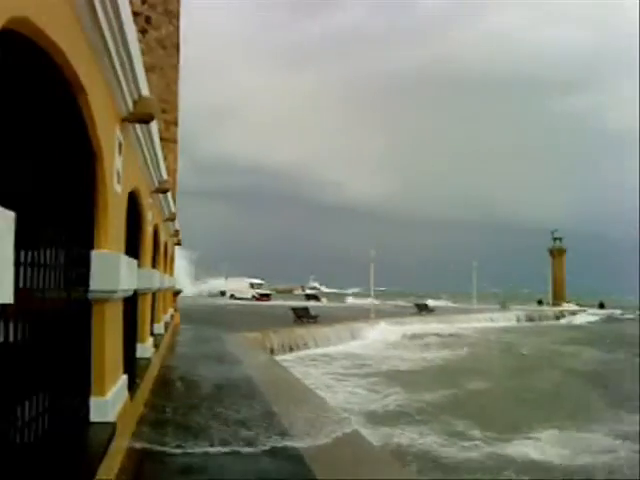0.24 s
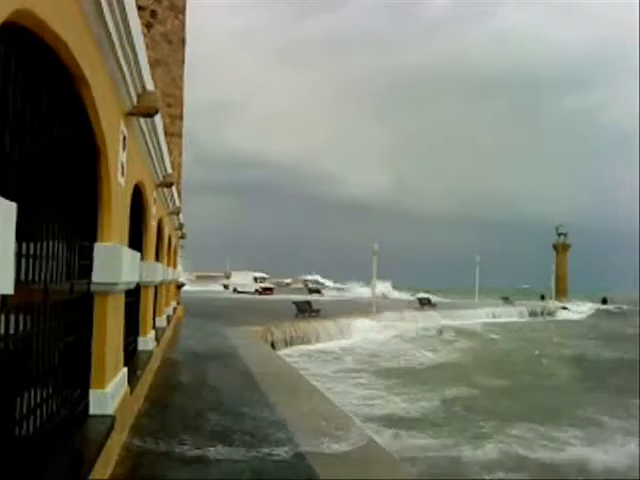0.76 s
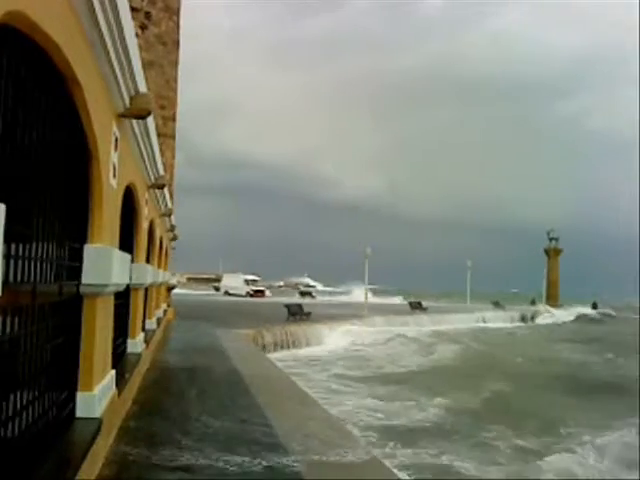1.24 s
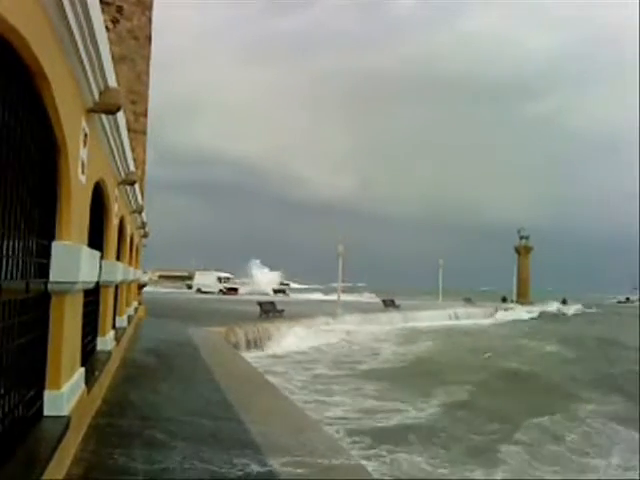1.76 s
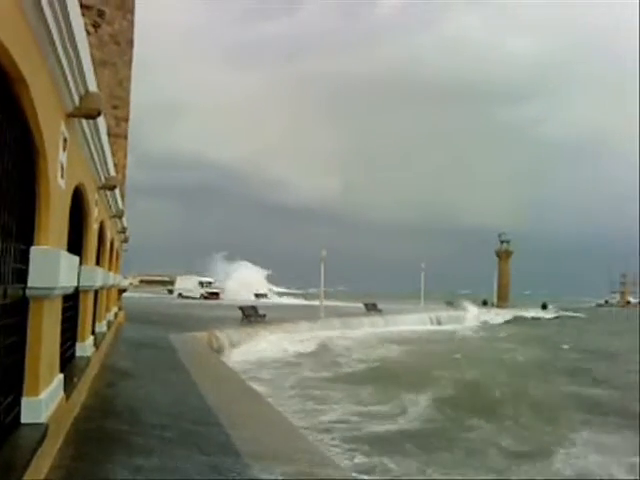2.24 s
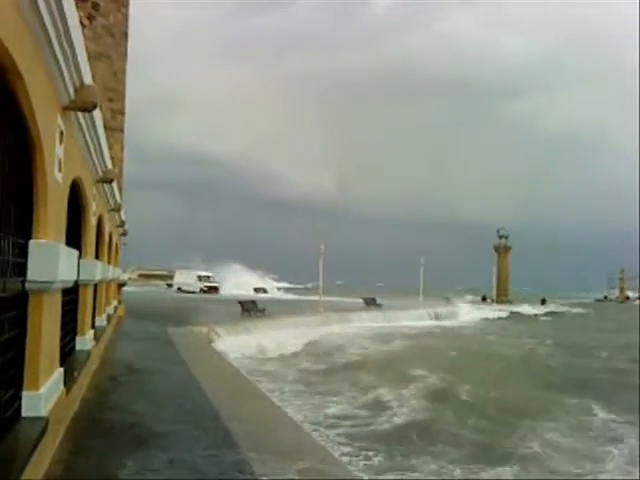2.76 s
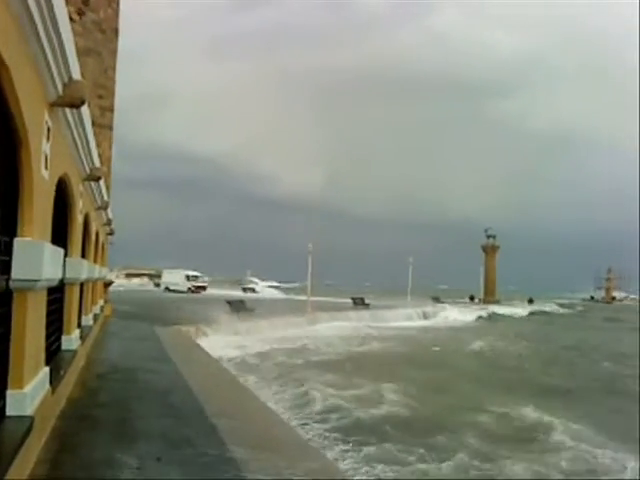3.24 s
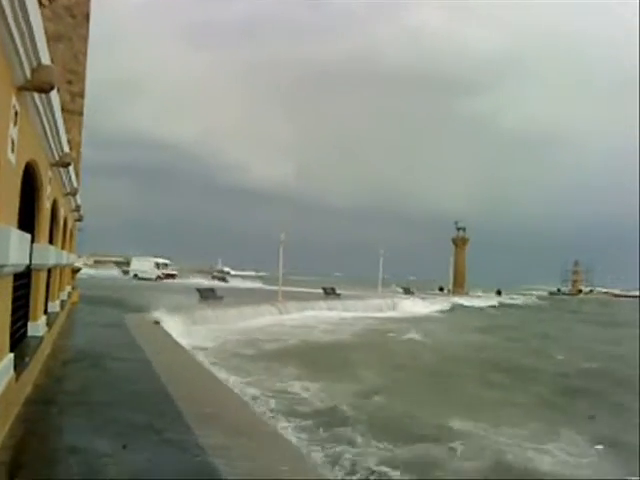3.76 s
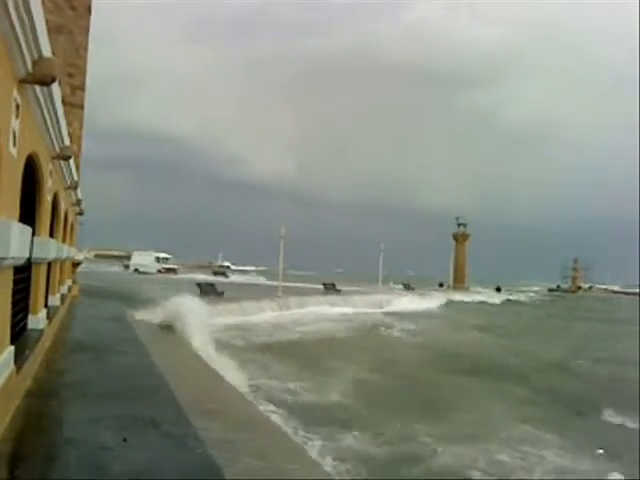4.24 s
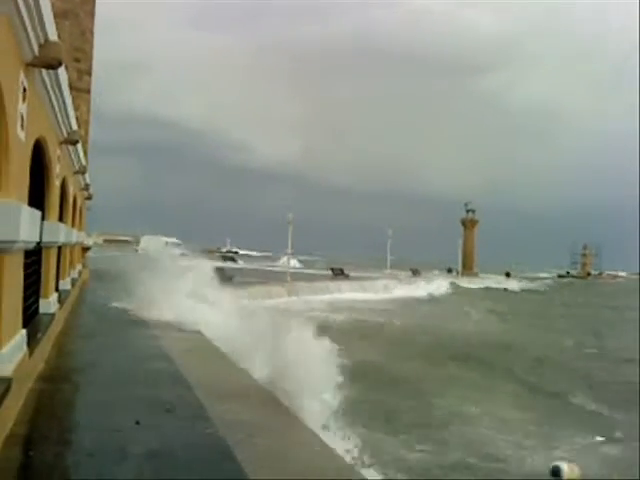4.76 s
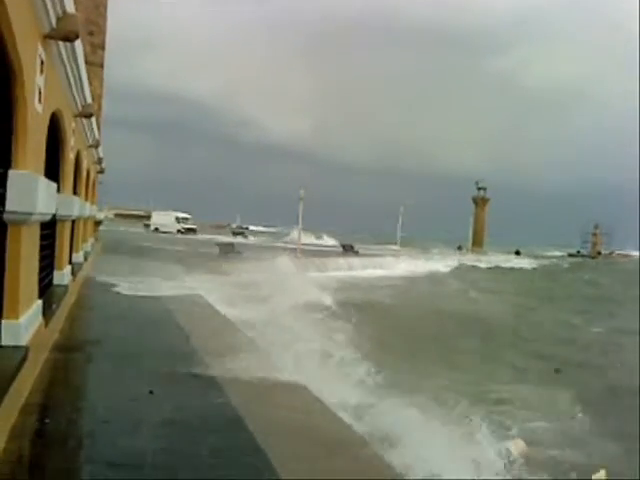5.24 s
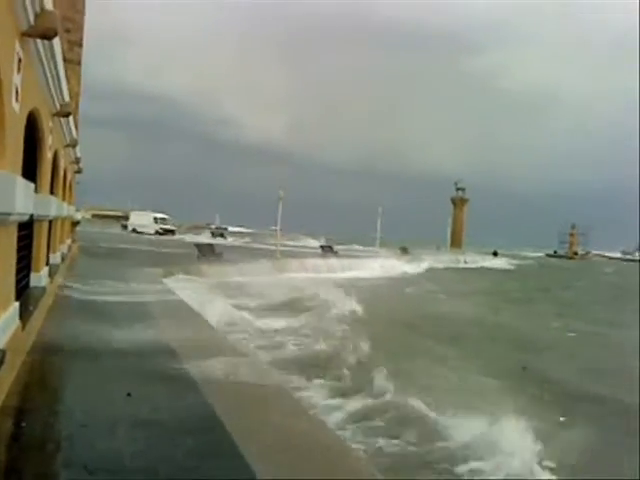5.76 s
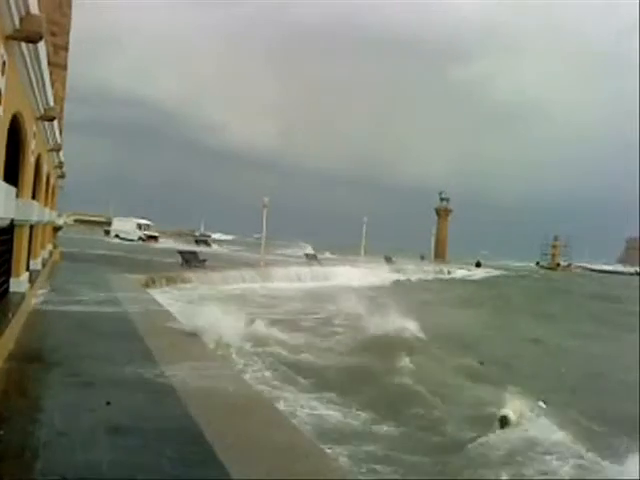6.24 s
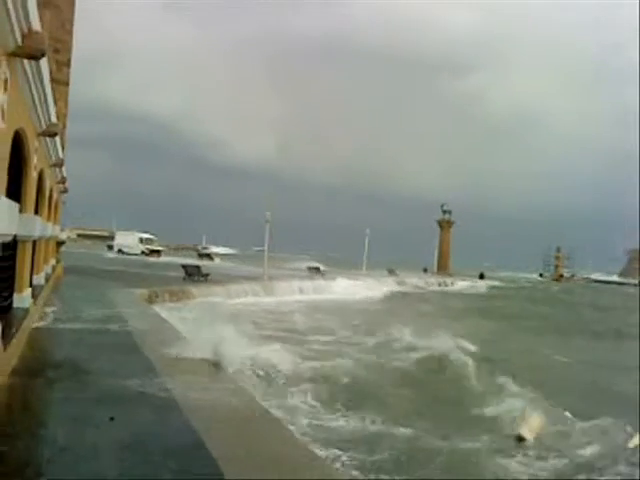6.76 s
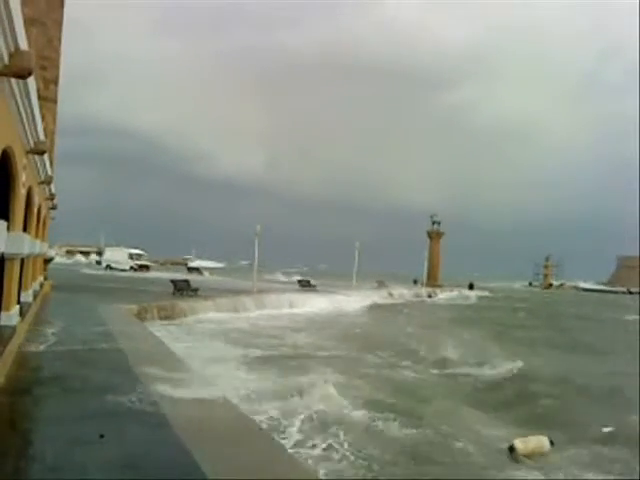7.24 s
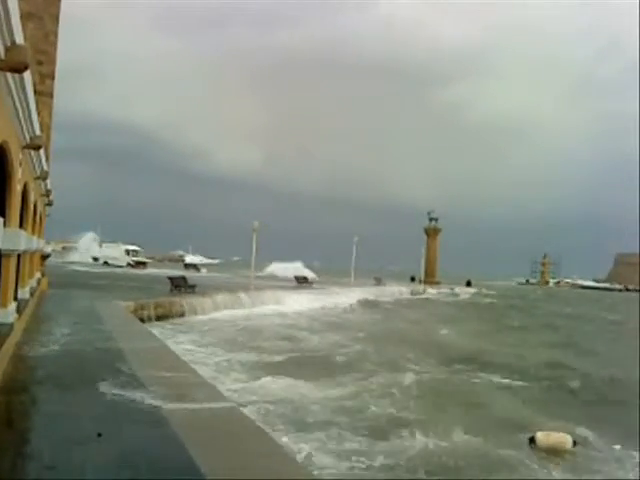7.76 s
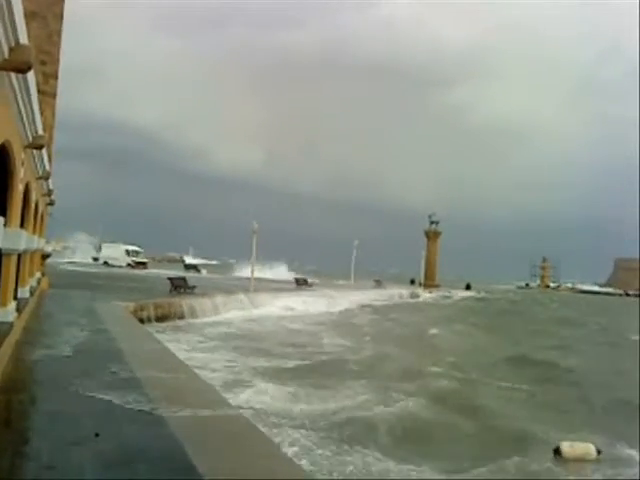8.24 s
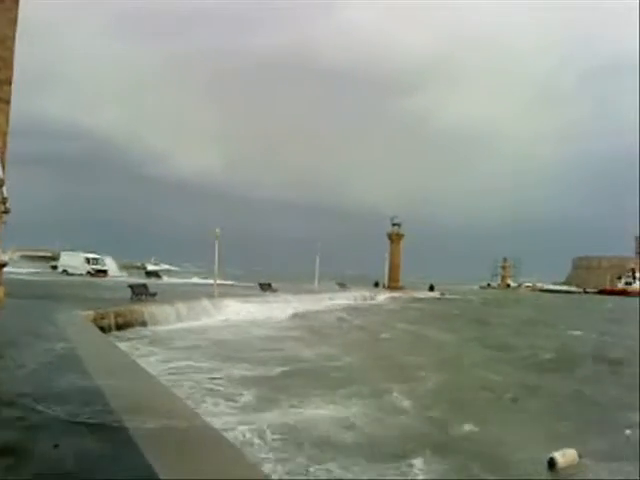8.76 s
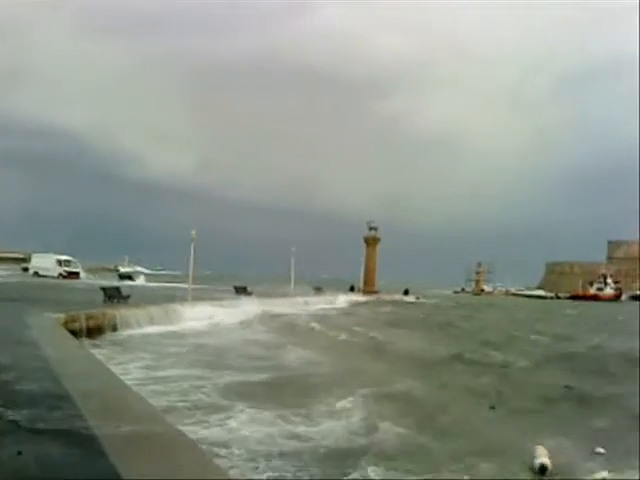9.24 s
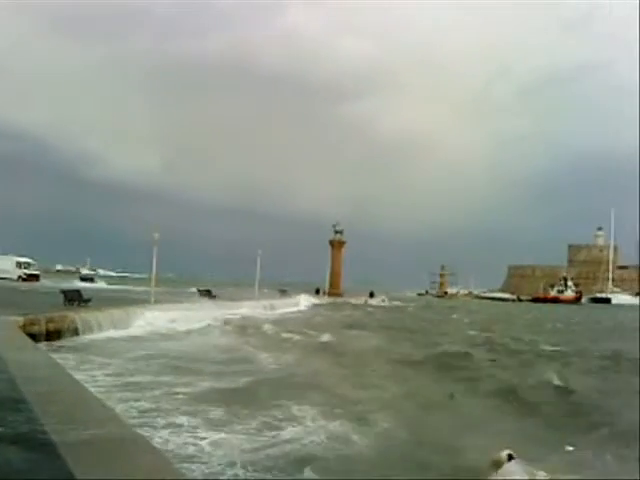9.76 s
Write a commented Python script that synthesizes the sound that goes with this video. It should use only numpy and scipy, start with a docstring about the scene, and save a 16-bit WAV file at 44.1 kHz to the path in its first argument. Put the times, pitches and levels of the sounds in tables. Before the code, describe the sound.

Hard wind gusts dominate, buffeting a small bare microphone with deep rumble, thumps, rasps and crackle. Behind them a rough sea roars and hisses along an open stone quay, rising gradually and dipping quickly. Near the middle a wave swells, bursts on the wall and falls back as splashing water, followed by a weaker surge. Gusts then keep striking, easing towards the end.

```python
"""Wind gusts buffet a small microphone on a stormy harbour quay and tear at its port; single eddies
thump, rasp and slap: coloured noise under gust envelopes, plus short bell-shaped noise bursts.
Behind them the levels of the sea's roar and the spray's hiss rise and dip together: noise churning by octaves.
Waves burst on the quay wall and rain back down: noise and random impacts under surge envelopes."""
import sys
import numpy as np
from scipy import signal
from scipy.fft import rfft, irfft
from scipy.io import wavfile
from scipy.ndimage import uniform_filter1d

SR = 44100
rng = np.random.default_rng(int(sys.argv[2]) if len(sys.argv) > 2 else 0)


def put_to_file(sound):
    """Save the sound as 16-bit audio at rate SR, in the file named by the first command-line argument."""
    columns = np.atleast_2d(sound).T  # one column per channel
    safe = np.clip(columns, -1, 1)
    whole_steps = np.round(safe * 32767)
    wavfile.write(sys.argv[1], SR, whole_steps.astype(np.int16))


N = 441000
T = np.arange(N) / SR


def undb(db):
    """Decibels to gain."""
    return 10 ** (np.asarray(db) / 20)


def unit(x):
    """Scale to rms 1."""
    return x / np.sqrt(np.mean(x ** 2))


def noise():
    """White noise."""
    return rng.standard_normal(N)


def colour(x, points):
    """Weight the spectrum of x by (hz, db) points joined on a log-frequency axis; rms 1."""
    hz, db = np.transpose(points)
    f_hz = np.maximum(np.arange(N // 2 + 1) * SR / N, 1)
    gain = undb(np.interp(np.log(f_hz), np.log(hz), db))
    return unit(irfft(rfft(x) * gain, N))


def walk(rate_hz):
    """Smooth random signal that changes about rate_hz times a second; rms 1."""
    width = max(int(SR / rate_hz), 2)
    return unit(uniform_filter1d(uniform_filter1d(noise(), width), width))


def even(x, span_s):
    """Hold the level of x steady over spans longer than span_s, keeping its quick flutter."""
    width = int(span_s * SR)
    power = uniform_filter1d(uniform_filter1d(x ** 2, width), width)
    return x / np.sqrt(power + 1e-9)


def drops(rate_hz, spread_db):
    """Random impacts of either sign, mostly small and a few large; rms 1."""
    hit = rng.random(N) < rate_hz / SR
    size = undb(spread_db * np.minimum(rng.exponential(size=N), 5))
    return unit(hit * size * np.sign(noise()))


def churn(x, depth_db, rate_hz):
    """Let each octave of x wax and wane by itself, as patches of foam come and go; rms 1."""
    f_hz = np.arange(N // 2 + 1) * SR / N
    octave = np.log2(np.clip(f_hz, 125, 8000) / 125)
    spectrum = rfft(x)
    total = np.zeros(N)
    for k in range(7):
        band = irfft(spectrum * np.maximum(1 - abs(octave - k), 0), N)  # bands overlap as triangles
        total += band * undb(depth_db * walk(rate_hz))
    return unit(total)


def envelope(start_s, hold_s, rise_s, fall_s):
    """Grow exponentially to 1 at start_s, hold, then die away; rise and fall are time constants."""
    before = (start_s - T) / rise_s
    after = (T - start_s - hold_s) / fall_s
    return np.exp(-np.maximum(np.maximum(before, after), 0))


def together(steady_db, events):
    """Gain of a steady level plus (db, envelope) events, whose powers add."""
    power = undb(steady_db) ** 2 + sum((undb(db) * shape) ** 2 for db, shape in events)
    return np.sqrt(power)


def sea_levels():
    """Gains of roar and spray: heard level rises, mostly gradual, and dips, mostly quick, shared by both."""
    # rises in the heard level of the sea: peak_s, hold_s, rise_s, fall_s, roar_db, spray_db
    level_rows = [(0.046, 0.18, 0.1, 0.11, -29, -58), (1.804, 0.42, 0.65, 0.034, -23.5, -32),
                  (2.69, 0.12, 0.45, 0.52, -27, -37), (4.05, 0.64, 0.31, 0.068, -29, -38.5),
                  (5.678, 0.75, 0.61, 0.073, -24.5, -33), (7.6, 0.078, 0.31, 0.23, -28, -37),
                  (7.997, 0.11, 0.17, 0.07, -27.5, -39.5), (9.643, 0.46, 0.26, 0.1, -26, -35)]
    base_roar_db, base_spray_db = -34.5, -44.5
    shapes = [envelope(s, hold, rise, fall) for s, hold, rise, fall, _, _ in level_rows]
    *_, roar_db, spray_db = np.transpose(level_rows)
    roar_gain = together(base_roar_db, zip(roar_db, shapes))
    spray_gain = together(base_spray_db, zip(spray_db, shapes))
    return roar_gain, spray_gain


def sea():
    """Churning surf roars all round; spray driven over the quay hisses with countless fine drops."""
    # spectrum of the surf: freq_hz, level_db
    roar_points = [(60, -16), (200, -4.5), (450, -1), (950, -1.5), (1350, 2), (1850, 1.5), (2250, -6.5),
                   (3200, -12), (4400, -18), (5300, -21.5), (6200, -25.5), (9000, -51)]
    # spectrum of the blown spray: freq_hz, level_db
    spray_points = [(1200, -10), (2400, 4.5), (3400, -0.5), (4500, 4.5), (5300, 1.5), (6100, 4.5),
                    (7200, 2), (8000, -1), (8700, -7.5), (9400, -21.5)]
    roar_gain, spray_gain = sea_levels()
    roar = churn(colour(noise(), roar_points), depth_db=1.2, rate_hz=22)
    mist = noise() + undb(-4) * drops(rate_hz=3000, spread_db=4.0)
    spray = churn(colour(mist, spray_points), depth_db=0.36, rate_hz=26)
    return roar_gain * roar + spray_gain * spray


def breakers():
    """Each wave climbs the wall and bursts; its water falls back in lumps and drops."""
    # waves bursting on the wall: burst_s, level_db, rise_s, fall_s
    waves = [(4.6, -22.5, 0.24, 0.45), (5.1, -29, 0.16, 0.42), (6.5, -46.5, .15, .25)]
    # spectrum of the falling water: freq_hz, level_db
    splash_points = [(80, -12), (170, 0.5), (350, -9), (650, 6), (950, 3), (1300, -1), (1900, -8),
                     (3000, -35), (7000, -27.5), (9000, -46)]
    surge = sum(undb(db) * envelope(s, 0, rise, fall) for s, db, rise, fall in waves)
    water = noise() + undb(-10.0) * drops(rate_hz=4500, spread_db=5.5)
    return surge * churn(colour(water, splash_points), depth_db=2.5, rate_hz=23)


def gusts():
    """Strength of buffeting and of tearing: gusts strike quickly, flutter and ebb back into the breeze."""
    # gusts on the microphone: start_s, hold_s, release_s, buffet_db, tear_db
    gust_rows = [(0.02, 0.06, 0.16, -15, -23.5), (0.306, 0.17, 0.094, -15, -22.5),
                 (0.596, 0.16, 0.52, -15, -25.5), (1.693, 0.05, 0.04, -19.5, -26),
                 (1.844, 0.21, 0.37, -17, -23), (2.768, 0.518, 0.03, -14, -23),
                 (3.39, 0.26, 0.43, -17, -24), (3.978, 0.033, 0.14, -16, -22),
                 (4.334, 0.05, 0.07, -16, -21), (4.487, 0.16, 0.76, -17, -22),
                 (5.325, 0.18, 0.17, -16, -23), (5.876, 0.05, 0.2, -17.5, -25.5),
                 (6.146, 0.25, 0.1, -18, -30), (6.468, 0.068, 0.12, -12.5, -21.5),
                 (7.198, 0.025, 0.025, -13, -23.5), (7.313, 0.18, 0.13, -15, -27),
                 (7.654, 0.035, 0.14, -14.5, -25), (7.862, 0.18, 0.06, -16.5, -26.5),
                 (8.098, 0.16, 0.033, -13, -25.5), (8.613, 0.14, 0.049, -15, -22),
                 (8.862, 0.13, 0.24, -18.5, -28), (9.069, 0.095, 0.73, -18, -27)]
    attack_s = 0.045
    breeze_buffet_db, breeze_tear_db = -31.5, -42.5  # wind between gusts
    flutter_db, flutter_hz = 1.0, 15
    shapes = [envelope(s, hold, attack_s, release) for s, hold, release, _, _ in gust_rows]
    *_, buffet_db, tear_db = np.transpose(gust_rows)
    flutter = undb(flutter_db * walk(flutter_hz))
    buffeting = flutter * together(breeze_buffet_db, zip(buffet_db, shapes))
    tearing = flutter * together(breeze_tear_db, zip(tear_db, shapes))
    return buffeting, tearing


def strays(tearing):
    """Random small eddies, as strong as their gust: the wider, the longer, deeper and stronger."""
    rate_hz = 13
    # each pair runs from the tightest eddy to the widest
    relative_db = (-9.5, 1.5)  # against the tearing
    length_range_s, top_range_hz = (0.005, 0.017), (3400, 330)
    when, width = rng.random((int(rate_hz * N / SR), 2)).T
    s = when * N / SR
    db = 20 * np.log10(np.interp(s, T, tearing)) + np.interp(width, [0, 1], relative_db)
    length_s = np.exp(np.interp(width, [0, 1], np.log(length_range_s)))
    top_hz = np.exp(np.interp(width, [0, 1], np.log(top_range_hz)))
    return list(zip(s, db, length_s, top_hz))


def add(track, sound, centre_s):
    """Mix a short sound into the track, centred on centre_s."""
    at = int(centre_s * SR) - len(sound) // 2 + np.arange(len(sound))
    inside = (at >= 0) & (at < N)
    track[at[inside]] += sound[inside]


def eddies(rows, breakup):
    """Bell-shaped bursts of ragged air, falling 12 dB an octave above their top; the port dulls the treble."""
    port = [(1900, 1.5), (2500, -4), (4100, -1.5), (6000, -2), (7200, -4.0), (9000, -20)]  # freq_hz, level_db
    air = even(colour(noise() * breakup, port), span_s=0.015)
    out = np.zeros(N)
    t = np.arange(-SR // 8, SR // 8) / SR
    for centre_s, level_db, length_s, top_hz in rows:
        start = rng.integers(N - len(t))
        low_pass = signal.butter(2, top_hz, fs=SR, output="sos")
        high_pass = signal.butter(1, top_hz / 7, "high", fs=SR, output="sos")
        burst = signal.sosfilt(np.vstack([low_pass, high_pass]), air[start:start + len(t)])
        bell = np.exp(-2 * (t / length_s) ** 2)
        burst_rms = np.sqrt(np.average(burst ** 2, weights=bell ** 2))
        add(out, undb(level_db) * bell * burst / burst_rms, centre_s)
    return out


def wind():
    """Eddies press on the diaphragm; at pressure peaks the flow breaks up into finer, brighter turbulence."""
    # spectrum of pressure on the diaphragm: freq_hz, level_db
    buffet_points = [(12, -17), (24, -3), (40, -3.5), (70, 0), (120, -1), (180, -4), (290, -8),
                     (450, -18.5), (900, -29.5), (2500, -78)]
    # spectrum of air torn at the port: freq_hz, level_db
    tear_points = [(100, -18.5), (230, -8.5), (320, 2.5), (450, 2), (700, -1), (1000, -6.5), (1500, -7.5),
                   (1900, -9), (2500, -20), (4000, -33), (6000, -39), (9000, -57)]
    # spectrum of the crackle in hard gusts: freq_hz, level_db
    crackle_points = [(400, -8), (1000, -3), (1800, -6.5), (2500, -4.5), (4100, -10), (6000, -18.5),
                      (9000, -38)]
    # hardest eddies at the port; low tops thump, high tops rasp: centre_s, level_db, length_s, top_hz
    eddy_rows = [(0.05, -21, 0.077, 2000), (0.092, -14, 0.02, 120), (0.36, -14.5, 0.016, 1000),
                 (0.408, -17.5, 0.0086, 2200), (0.437, -20, 0.016, 1800), (0.699, -25, 0.011, 2000),
                 (2.27, -11.5, 0.044, 130), (2.951, -23, 0.029, 1900), (3.027, -20.5, 0.017, 1700),
                 (3.165, -23, 0.087, 1090), (3.277, -16, 0.019, 500), (3.362, -9, 0.018, 90),
                 (3.407, -23.5, 0.007, 2180), (4.345, -24.5, 0.032, 1900), (4.37, -14.5, 0.041, 80),
                 (4.77, -15, 0.063, 80), (5.545, -16, 0.06, 100), (6.52, -17, 0.014, 1100),
                 (6.633, -22.5, 0.014, 2900), (6.646, -19, 0.005, 3220), (6.649, -10, 0.015, 140),
                 (6.683, -23, 0.019, 1010), (6.836, -36, 0.015, 3800), (7.22, -25.5, 0.018, 2100),
                 (7.322, -21.5, 0.043, 1500), (7.453, -23.5, 0.098, 1900), (7.689, -14, 0.022, 450),
                 (7.741, -24.5, 0.014, 2420), (7.909, -21, 0.045, 1580), (8.185, -19, 0.07, 1680),
                 (8.686, -19.5, 0.047, 1800), (8.711, -21, 0.005, 3100), (8.927, -23.5, 0.02, 2180),
                 (9.06, -26, 0.011, 2900), (9.218, -12.5, 0.01, 400)]
    buffeting, tearing = gusts()
    ragged = noise() * undb(1.85 * walk(140))
    pressure = even(colour(ragged, buffet_points), span_s=0.094)
    breakup = unit((0.68 + abs(pressure)) ** 0.66 * undb(2.3 * walk(60)))
    tear = even(colour(noise(), tear_points) * breakup, span_s=0.086)
    # the product of both strengths favours hard gusts
    flecks = undb(9 * np.tanh(walk(130)))
    crackle = unit(buffeting * tearing * flecks * colour(noise(), crackle_points))
    bursts = eddies(eddy_rows + strays(tearing), breakup)
    return buffeting * pressure + tearing * tear + undb(-41) * crackle + bursts


def scene():
    """Wind close by, the sea and breakers behind it, one channel."""
    return (sea() + breakers() + wind())[None]


def record(dry):
    """The microphone channel softly rounds the largest pressure peaks and cuts the top."""
    ceiling, top_hz = 1.0, 9500
    rounded = ceiling * np.tanh(dry / ceiling)
    low_pass = signal.ellip(10, 0.2, 80, top_hz, fs=SR, output="sos")  # ripple and stopband in dB
    return signal.sosfilt(low_pass, rounded)


dry = scene()
out = record(dry)
put_to_file(out)
```